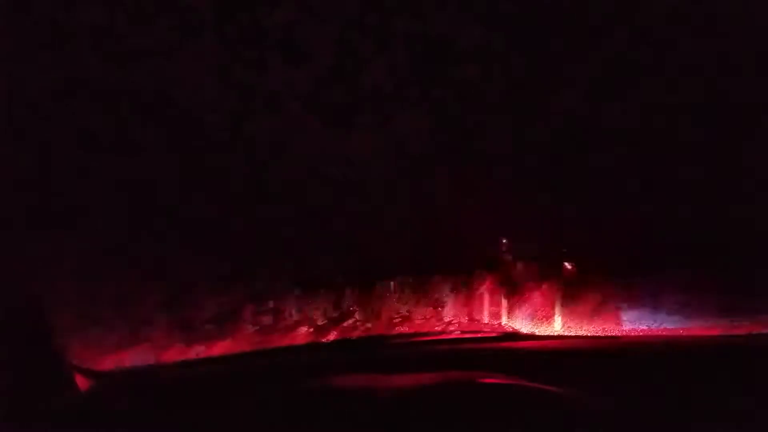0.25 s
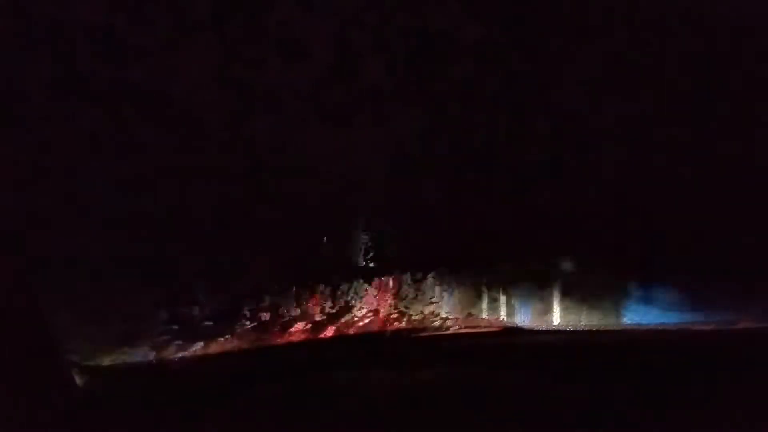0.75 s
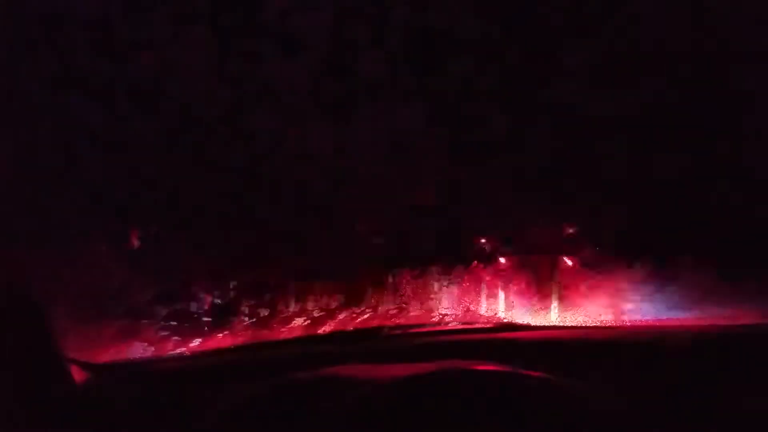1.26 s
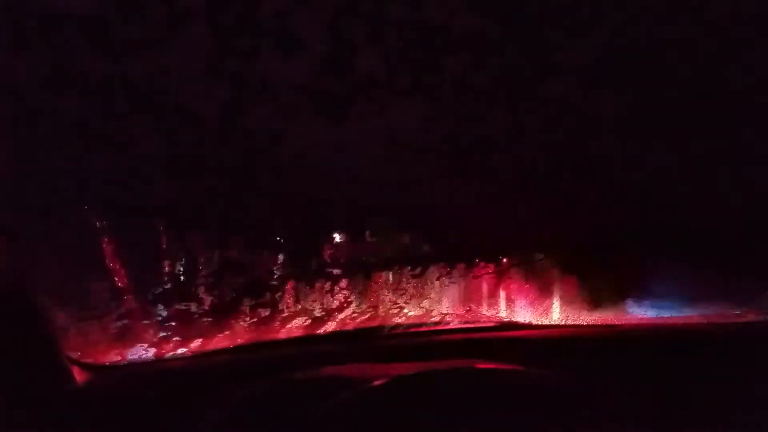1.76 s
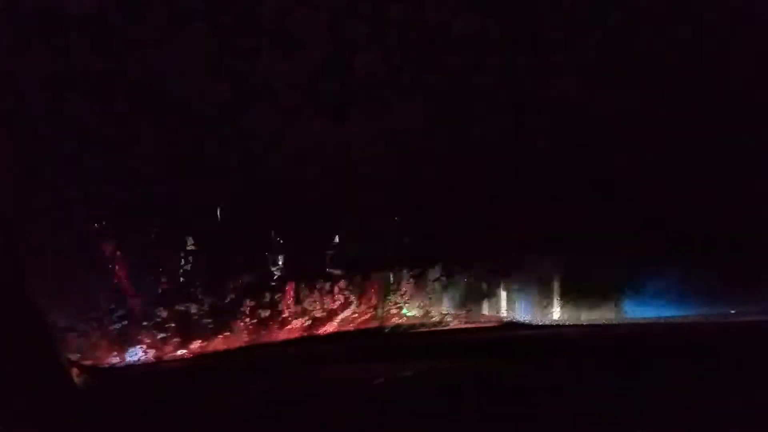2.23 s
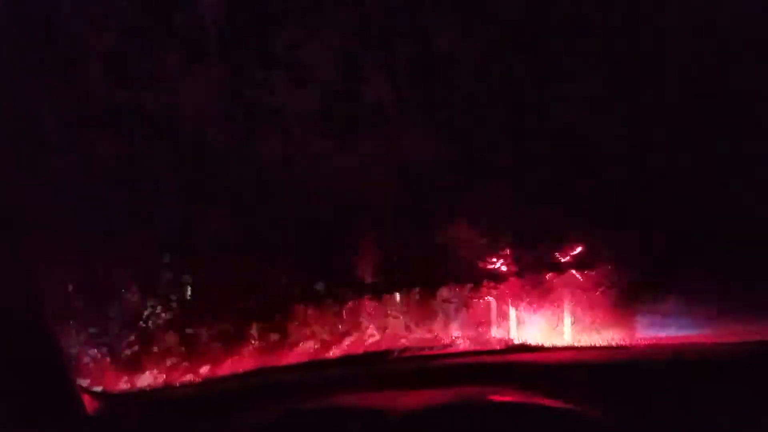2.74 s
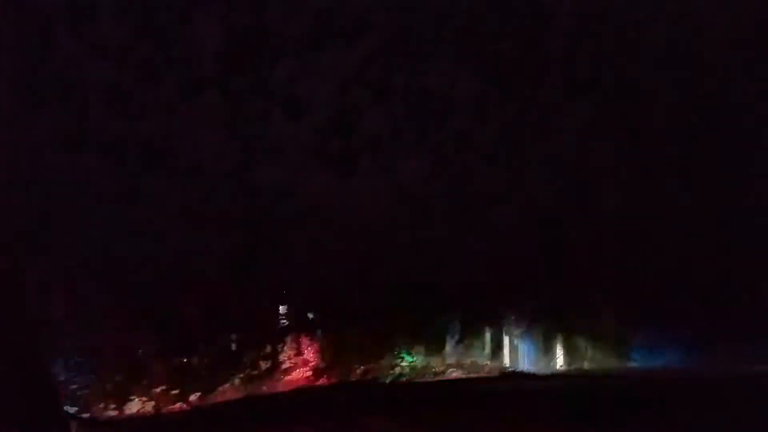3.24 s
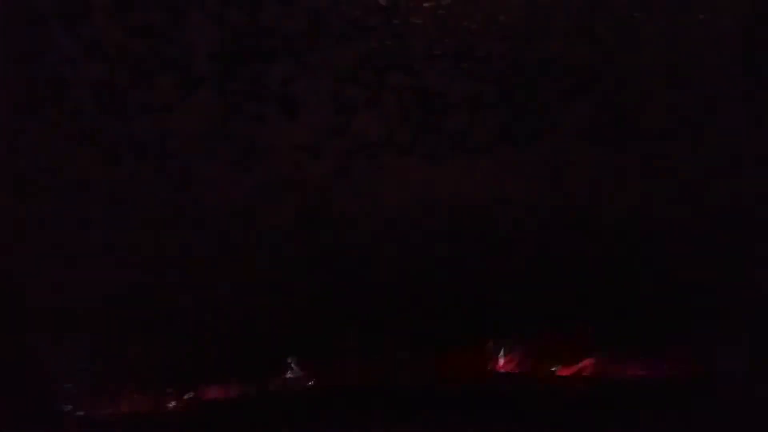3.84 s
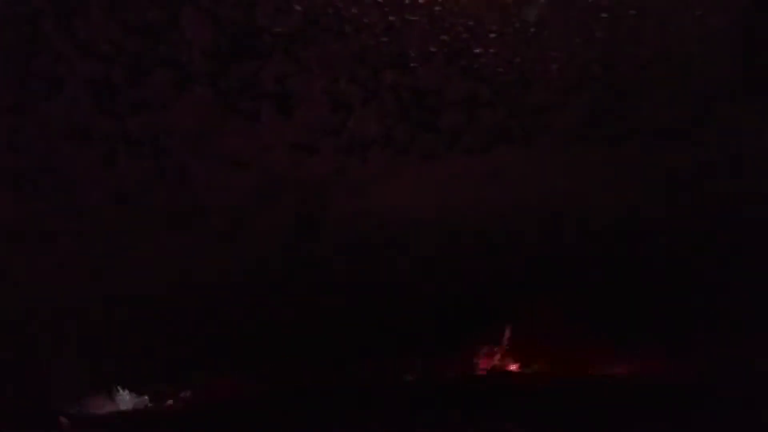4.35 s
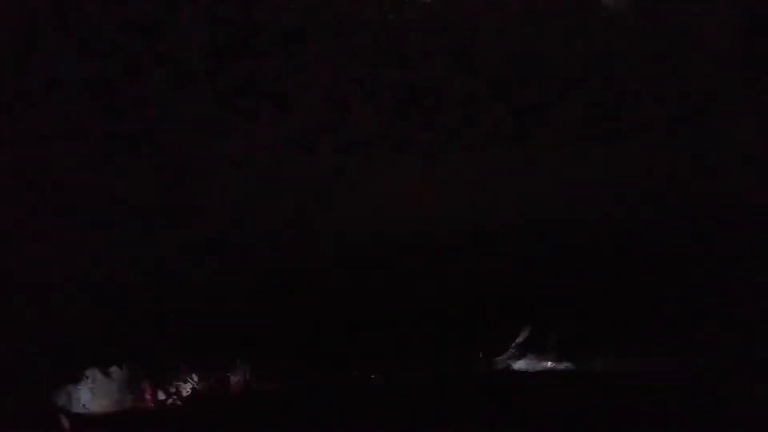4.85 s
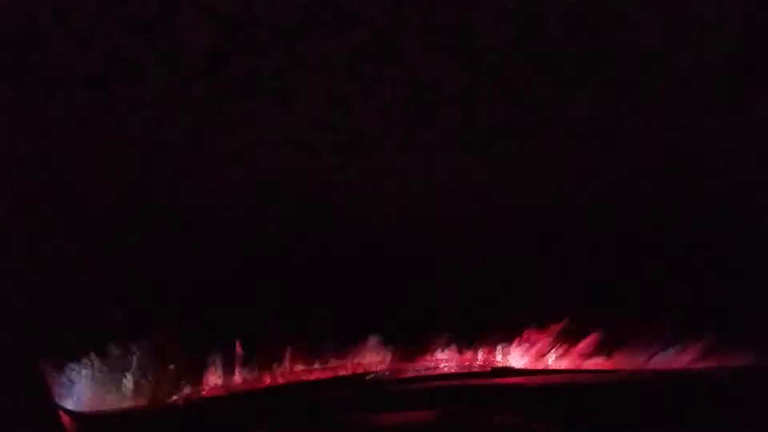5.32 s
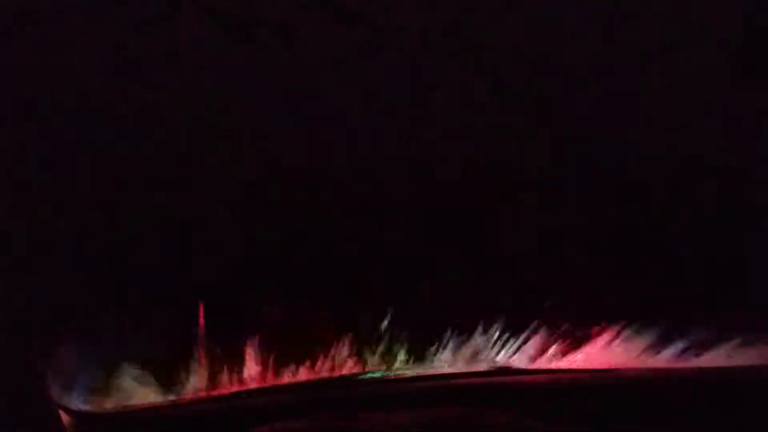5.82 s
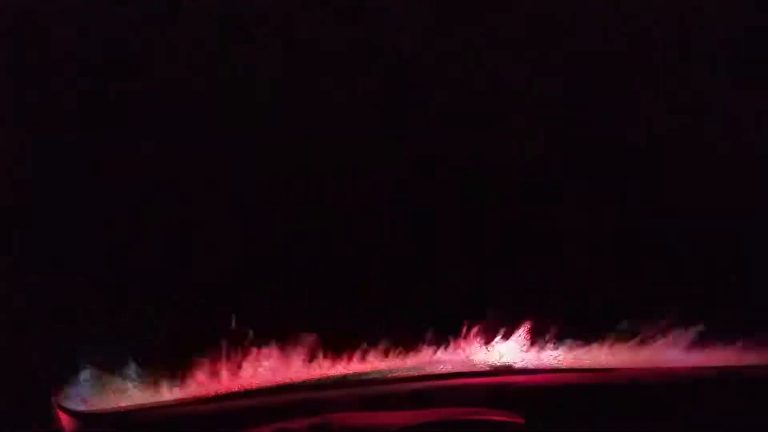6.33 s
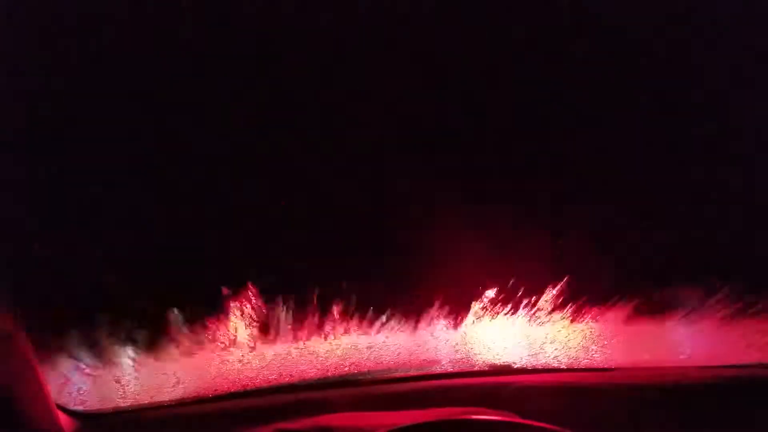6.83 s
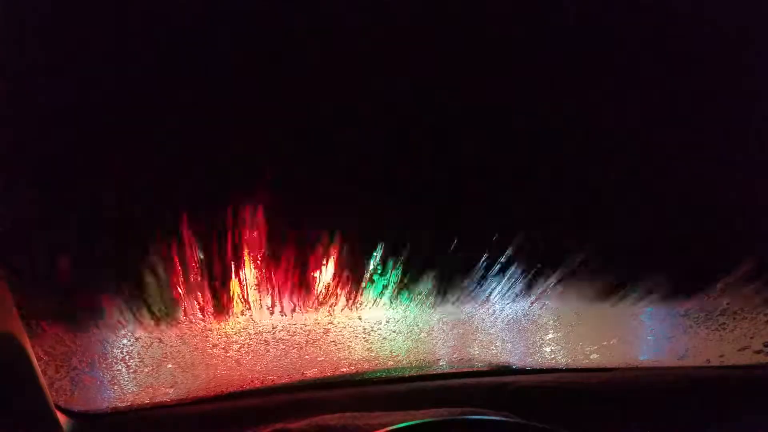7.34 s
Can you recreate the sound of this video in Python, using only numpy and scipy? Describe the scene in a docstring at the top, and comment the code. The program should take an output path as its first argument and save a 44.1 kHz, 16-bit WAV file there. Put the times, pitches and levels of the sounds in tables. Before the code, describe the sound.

Inside a car in an automatic wash, machinery drones, then spinning brushes drum on the body and fling sizzling water at the windscreen.

```python
"""A wavering drone of pumps and brush motors, heard inside a closed car in an automatic wash.
A mist jet shuts off early on; stray cloth strips graze a door. After three seconds the spinning
brushes reach the car: they drum on the steel panels, scrub over the roof and fling water at the
windscreen, where fine spray sizzles and single fat drops tick."""
import sys
import numpy as np
from scipy import signal
from scipy.fft import rfft, irfft, next_fast_len
from scipy.io import wavfile
from scipy.ndimage import uniform_filter1d

SR = 44100
rng = np.random.default_rng(int(sys.argv[2]) if len(sys.argv) > 2 else 0)


def transcribe(signal):
    """Save signal, clipped to [-1, 1], as a 16-bit WAV file at the path in sys.argv[1]."""
    frames = np.atleast_2d(signal).T
    limited = np.clip(frames, -1, 1)
    pcm = np.round(limited * 32767).astype(np.int16)
    wavfile.write(sys.argv[1], SR, pcm)


N = 334278
TIME_S = np.arange(N) / SR
FFT_SIZE = 2 * next_fast_len(N // 2 + 8192)
FREQS_HZ = np.maximum(np.arange(FFT_SIZE // 2 + 1) * SR / FFT_SIZE, 1)
CUTOFF_HZ = 15900
REACH_S, TOUCH_S = 2.98, 3.7  # brushes: first contact, full contact

# steel panel modes: pitch_hz, width_hz, level_db
PANEL_MODES = [(72.5, 18, -5.5), (87, 17, 4), (109.7, 23.2, 0.5), (133.1, 27, -1), (160.7, 36.6, -7.5)]
# cloth on the roof: freq_hz, density_db
SCRUB_SPECTRUM = [(250, -15), (420, 4.5), (600, 1.5), (680, 2), (800, 5), (1020, -5.5), (1250, -5),
                  (1550, -20), (2500, -22.5), (5000, -56.5)]
# coarse water on glass: freq_hz, density_db
SPLASH_SPECTRUM = [(500, -4), (1100, -1), (1600, 5.5), (2000, 5.5), (2600, 0), (3100, -5.5), (3800, -4.5),
                   (4800, -14.5), (6500, -15.5), (9000, -41.5), (15500, -28)]
# fine water on glass: freq_hz, density_db
SPRAY_SPECTRUM = [(1500, -30), (3500, -5), (4900, -1.5), (5800, -0.5), (7000, -2.5), (8000, -9.5),
                  (9000, -22.5), (11000, -16.5), (15500, -15)]


def from_db(db):
    """Decibels to gain."""
    return 10 ** (np.asarray(db) / 20)


def unit_rms(x):
    """Scale to unit power."""
    return x / np.sqrt(np.mean(x ** 2) + 1e-20)


def envelope(rows):
    """Gain per sample through rows of time_s, level_db."""
    return from_db(np.interp(TIME_S, *np.transpose(rows)))


def swells(rows):
    """Gaussian gain bumps from rows of centre_s, half_length_s, level_db."""
    return sum(from_db(db) * np.exp(-((TIME_S - s) / half_s) ** 2) for s, half_s, db in rows)


def strikes(rows):
    """Impulse train from rows of start_s, level_db."""
    hits = np.zeros(N)
    for start_s, db in rows:
        hits[int(np.clip(start_s * SR, 0, N - 1))] = from_db(db)
    return hits


def response(spectrum):
    """Gain per FFT bin through rows of freq_hz, level_db."""
    hz, db = np.transpose(spectrum)
    return from_db(np.interp(np.log(FREQS_HZ), np.log(hz), db))


def colour(x, spectrum):
    """Minimum-phase filter of unit power gain."""
    cepstrum = irfft(np.log(unit_rms(response(spectrum))))
    cepstrum[1:FFT_SIZE // 2] *= 2
    cepstrum[FFT_SIZE // 2 + 1:] = 0
    return irfft(rfft(x, FFT_SIZE) * np.exp(rfft(cepstrum)))[..., :N]


def drift(corner_hz):
    """Slow random wander, rms 1."""
    count = N // 40
    hz = np.arange(count // 2 + 1) * SR / N
    slow = irfft(rfft(rng.standard_normal(count)) / (1 + (hz / corner_hz) ** 2))
    return np.interp(np.linspace(0, len(slow) - 1, N), np.arange(len(slow)), unit_rms(slow))


def cabin(pair):
    """Mid and side to left and right: alike in the bass, diffuse in the treble."""
    # cabin stereo width: freq_hz, side_minus_mid_db
    width_curve = [(40, -24), (90, -19.5), (170, -20), (310, -5), (420, -8), (650, -1.5), (800, -8),
                   (1030, 4), (1200, -2.5), (1550, 4.5), (2250, -3.5), (3300, 1), (5000, 0.5), (15000, 0)]
    # cabin balance: freq_hz, left_minus_right_db
    lean_curve = [(150, 0), (600, -1.5), (1300, 4), (2600, 0.3), (5500, 2.5), (10000, -0.5)]
    mid, side = rfft(pair, FFT_SIZE)
    width, lean = response(width_curve), np.sqrt(response(lean_curve))
    left_right = np.array([(mid + width * side) * lean, (mid - width * side) / lean])
    return irfft(left_right)[:, :N]


def steady(x, window_s):
    """Hold the mid signal at unit power over a sliding window."""
    power = uniform_filter1d(x.mean(0) ** 2, max(int(window_s * SR), 2))
    return x / np.sqrt(np.maximum(power, 1e-18))


def impacts(per_s, spread_db):
    """Two trains of random hits with exponentially distributed dB levels."""
    hit = rng.random((2, N)) < per_s / SR
    count = hit.sum()
    level_db = spread_db * np.minimum(rng.exponential(1, count), 5)
    trains = np.zeros((2, N))
    trains[hit] = from_db(level_db) * rng.choice([-1, 1], count)
    return trains


def texture(spectrum, per_s, spread_db, window_s):
    """Dense random hits merge into a steady stereo noise."""
    return steady(cabin(colour(impacts(per_s, spread_db), spectrum)), window_s)


def bursts(hits, spectrum, burst_s, tail_db, tail_s):
    """Each hit starts a fast-dying noise burst; the cabin adds a brief tail."""
    burst, tail = (signal.lfilter([1], [1, -np.exp(-1 / (decay_s * SR))], hits + 1e-18)
                   for decay_s in (burst_s, tail_s))
    noise = rng.choice([-1, 1], (2, N))
    return cabin(colour((burst + from_db(tail_db) * tail) * noise, spectrum))


def motor_tone(hz, width_hz):
    """A motor line whose speed wanders by about its width; rms 1."""
    return np.sqrt(2) * np.sin(2 * np.pi * np.cumsum(hz + width_hz * drift(9.39)) / SR)


def machinery(roar_db=-21.5, hum_db=-35.0, motor_waver_db=1.5, hum_waver_db=2.5):
    """Roar of the wash hall through the body, with motor tones and the pump's hum."""
    # machine rumble and hiss: freq_hz, density_db
    rumble = [(22, -19.5), (37, -20), (44, -14.5), (54, -13.5), (66, -16), (85, -10), (98, -9), (120, -2),
              (147, 1), (195, -6), (242, -2.5), (260, -6), (278, -2.5), (320, -9.5), (362, -8.5),
              (420, -14.5)]
    hiss = [(480, -8), (560, -13), (680, -19.5), (800, -17), (980, -26), (1200, -27.5), (1550, -34),
            (2100, -37), (3100, -45), (4300, -48.5), (6800, -58.5), (9000, -73.5), (15500, -65)]
    # motor lines: pitch_hz, level_db, width_hz
    lines = [(120.5, -32.5, 2.7), (273.5, -39.5, 3.6), (776, -45, 17.86)]
    # pump hum swells: centre_s, half_length_s, level_db
    hum_swells = [(0.06, 0.05, -36), (1.15, 0.14, -36), (1.74, 0.05, -31), (2.31, 0.025, -27),
                  (2.93, 0.12, -31.5), (3.31, 0.07, -26), (3.78, 0.1, -31.5), (5.7, 0.1, -32),
                  (6.25, 0.07, -34), (6.85, 0.06, -30)]
    roar = steady(cabin(colour(rng.standard_normal((2, N)), rumble + hiss)), window_s=0.18)
    motors = sum(from_db(db + motor_waver_db * drift(5.0)) * motor_tone(hz, width_hz)
                 for hz, db, width_hz in lines)
    hum_gain = from_db(hum_db + hum_waver_db * drift(12.0)) + from_db(-1.0) * swells(hum_swells)
    return from_db(roar_db) * roar + motors + hum_gain * motor_tone(hz=518, width_hz=3.07)


def brush_motor(idle_hz=242.6, sag_hz=3.015, idle_db=-32, load_db=-30, waver_db=0.5,
                load_from_s=4.85, load_to_s=6.55, ramp_s=0.14):
    """The motor throbs at idle; it grows louder and sags while the brush bears on the roof."""
    # idle throbs: centre_s, half_length_s, level_db
    throbs = [(0.18, 0.048, -32), (1.06, 0.053, -30), (1.82, 0.065, -37), (2.92, 0.094, -31)]
    load = np.clip(np.minimum(TIME_S - load_from_s, load_to_s - TIME_S) / ramp_s, 0, 1)
    gain = from_db(idle_db) + swells(throbs) + from_db(load_db) * load
    return gain * from_db(waver_db * drift(6.5)) * motor_tone(idle_hz - sag_hz * load, width_hz=3.03)


def jet_gains(splash_db=-54, spray_db=-66, mist_db=-58, sputter_db=2.0, off_s=0.26, fall_db_per_s=49):
    """Splash, spray and mist gains of a fine jet that sputters, then shuts off."""
    flow_db = sputter_db * drift(18) - fall_db_per_s * np.maximum(TIME_S - off_s, 0)
    return np.array([from_db(db + flow_db) for db in (splash_db, spray_db, mist_db)])


def brush_gap(lead_s=0):
    """1 while the brushes are away, 0 once they lie on the car."""
    return 1 - np.clip((TIME_S + lead_s - REACH_S) / (TOUCH_S - REACH_S), 0, 1)


def flung_gains(splash_db=-40, spray_db=-54, mist_db=-58.5, away_db=-14.5, mist_away_db=-20,
                growth_db_per_s=1.7, thinning_db_per_s=8.0, thinning_s=7.2):
    """Splash, spray and mist gains rise as the brushes close in; the mist leads and thins at the end."""
    # thicker sheets of water: centre_s, half_length_s, rise_db
    surges = [(4.19, 0.037, 3), (4.875, 0.21, 2.5), (5.514, 0.26, 7), (6.715, 0.14, 2.5)]
    gap, mist_gap = brush_gap(), brush_gap(lead_s=0.1)
    flow_db = sum(db * np.exp(-((TIME_S - s) / half_s) ** 2) for s, half_s, db in surges)
    flow_db += (1 - gap) * drift(35.0)
    growth_db = growth_db_per_s * np.clip(TIME_S - TOUCH_S, 0, 3.2)
    thinning_db = thinning_db_per_s * np.maximum(TIME_S - thinning_s, 0)
    # flow lifts the finest drops most
    return from_db([splash_db + away_db * gap + 0.62 * flow_db,
                    spray_db + away_db * gap + flow_db + growth_db,
                    mist_db + mist_away_db * mist_gap + 1.55 * flow_db - thinning_db])


def sizzle(lashing, splash_gain, spray_gain, mist_gain, trim_db=-0.5,
           splash_clump_db=1.57, spray_clump_db=1.67, mist_clump_db=2.0):
    """Strips throw clumps of drops at the glass; the smaller the drops, the higher they sizzle."""
    # mist on glass: freq_hz, density_db
    mist_spectrum = [(4000, -16), (7000, -7), (9000, -9.5), (10200, -7), (11200, 2.5), (12800, -1),
                     (14000, 2.5), (15500, -2.5)]
    splash = texture(SPLASH_SPECTRUM, per_s=5000, spread_db=1.0, window_s=0.13)
    spray = texture(SPRAY_SPECTRUM, per_s=1800, spread_db=0.6, window_s=0.11)
    mist = texture(mist_spectrum, per_s=9900, spread_db=4.5, window_s=0.1)
    return (from_db(splash_clump_db * lashing) * splash_gain * splash
            + from_db(trim_db + spray_clump_db * lashing) * spray_gain * spray
            + from_db(trim_db + mist_clump_db * drift(45)) * mist_gain * mist)


def patter(spray_gain, trim_db=-2.0, decay_cycles=3.0, lowest_hz=1900, pitches=20):
    """Small drops land one by one, each ringing a few cycles at a random pitch."""
    # small drops on glass: freq_hz, density_db
    spectrum = [(1500, 4), (2100, 4.5), (3200, 3), (4500, -2), (6500, 0.5), (8000, -9.5), (9300, -20),
                (11300, -8.5), (15500, -9)]
    hits = impacts(per_s=600, spread_db=3.0)
    pitch_index = rng.integers(0, pitches, N)
    rings = 0
    for k, hz in enumerate(np.geomspace(lowest_hz, CUTOFF_HZ, pitches)):
        radius, angle = np.exp(-hz / (decay_cycles * SR)), 2 * np.pi * hz / SR
        resonator = [angle * np.sin(angle)], [1, -2 * radius * np.cos(angle), radius ** 2]
        rings += signal.lfilter(*resonator, hits * (pitch_index == k) + 1e-18)
    return from_db(trim_db) * spray_gain * unit_rms(cabin(colour(rings, spectrum)))


def fat_drops(mist_gain, tick_db=-5.5, splat_db=8.0, spatter_db=3.5):
    """Fat drops tick, the biggest with a lower splat; smaller strays follow the mist."""
    # fat drops: start_s, level_db
    landings = [(0.022, -34), (0.3062, -43), (0.6399, -43), (0.7512, -40.5), (1.085, -39), (1.1917, -41),
                (1.5344, -45), (1.6407, -43.5), (2.5331, -39), (2.8983, -40.5), (3.3363, -41),
                (3.4256, -36), (3.4685, -35), (3.632, -38), (3.9299, -32), (4.0302, -34), (4.1613, -42),
                (4.3625, -31), (4.484, -34), (4.615, -38), (4.73, -43), (4.9021, -38), (5.0942, -33),
                (5.1607, -28), (5.3792, -27), (5.9449, -31), (6.4907, -23.5), (6.6852, -30), (6.7316, -29),
                (6.79, -20.5), (7.2302, -22.5), (7.4046, -28), (7.5438, -31)]
    # tick on glass: freq_hz, density_db
    tick_spectrum = [(1500, -20.5), (4800, -7.5), (6200, -0.5), (7500, -5), (9500, -13), (11500, -7.5),
                     (13000, -11), (15000, -3)]
    drops = strikes(landings)
    strays = mist_gain * np.abs(impacts(per_s=110, spread_db=-0.2)[0])
    spatter = from_db(spatter_db) * mist_gain * np.abs(impacts(per_s=150, spread_db=0.5)[0])
    splat_hits = from_db(splat_db) * drops ** 2 + spatter
    tick_hits = from_db(tick_db) * drops + strays
    splats = bursts(splat_hits, SPRAY_SPECTRUM, burst_s=0.0014, tail_db=-20, tail_s=0.009)
    ticks = bursts(tick_hits, tick_spectrum, burst_s=0.0014, tail_db=-11.5, tail_s=0.0089)
    return splats + ticks


def plinks(decay_s=0.0026):
    """Two drops ring briefly as they land."""
    # ringing drops: start_s, pitch_hz, level_db
    landings = [(2.14, 8400, -51), (6.4903, 5900, -33)]
    rings = 0
    for start_s, hz, db in landings:
        age_s = np.maximum(TIME_S - start_s, 0)
        rings += from_db(db) * np.exp(-age_s / decay_s) * np.sin(2 * np.pi * hz * age_s)
    return rings


def squeak(centre_s=0.063, half_length_s=0.00076, hz=1880, fall_hz_per_s=55000, level_db=-25):
    """A wet strip slips once on the glass: a tiny falling chirp."""
    offset_s = TIME_S - centre_s
    chirp = np.sin(2 * np.pi * offset_s * (hz - fall_hz_per_s * offset_s / 2))
    return swells([(centre_s, half_length_s, level_db)]) * chirp


def slaps(trim_db=-5.5):
    """Wet strips and gouts of water slap the glass."""
    # slaps: start_s, level_db
    landings = [(0.0627, -29), (3.5736, -35), (3.5831, -22.5), (3.892, -27), (3.931, -25), (5.0776, -30),
                (5.3802, -32), (5.7564, -21.5), (5.8074, -25), (6.2751, -28), (6.79, -28.5), (7.2302, -23),
                (7.4046, -35), (7.5572, -30)]
    hits = from_db(trim_db) * strikes(landings)
    return bursts(hits, SPLASH_SPECTRUM, burst_s=0.0046, tail_db=-19, tail_s=0.0077)


def windscreen(lashing):
    """Water from the brushes and the jet lands on the glass."""
    # gouts breaking up: centre_s, half_length_s, level_db
    splatters = [(3.895, 0.013, -35), (4.825, 0.013, -34), (4.868, 0.017, -35), (4.908, 0.012, -36),
                 (5.27, 0.023, -46), (5.55, 0.078, -41)]
    splash_gain, spray_gain, mist_gain = np.hypot(flung_gains(), jet_gains())
    splash_gain = np.hypot(splash_gain, swells(splatters))
    return (slaps() + sizzle(lashing, splash_gain, spray_gain, mist_gain)
            + patter(spray_gain) + fat_drops(mist_gain) + plinks() + squeak())


def panel_mode(hits, hz, width_hz):
    """One resonance of a steel panel, driven by hits."""
    band = signal.butter(2, [hz - width_hz / 2, hz + width_hz / 2], "band", fs=SR, output="sos")
    return signal.sosfilt(band, hits)


def grazing():
    """Stray strips flutter against a door panel, which booms softly."""
    # grazes: centre_s, half_length_s, level_db
    grazes = [(0.08, 0.095, -21), (0.73, 0.097, -21), (1.35, 0.14, -26)]
    door = panel_mode(impacts(per_s=400, spread_db=2.5), hz=138, width_hz=44)
    return swells(grazes) * steady(cabin(door), window_s=0.2)


def smacks(trim_db=-3.5):
    """Single strips land flat on the roof."""
    # smacks: start_s, level_db
    landings = [(4.89, -24), (5.552, -20), (5.862, -17), (5.931, -20), (6.106, -15.5), (6.117, -17.5),
                (6.167, -18.5), (6.235, -17), (6.637, -17.5)]
    hits = from_db(trim_db) * strikes(landings)
    return bursts(hits, SCRUB_SPECTRUM, burst_s=0.0094, tail_db=-18.5, tail_s=0.023)


def passing(nearest_s, approach_s, retreat_s, peak_db):
    """Gain of a source moving past: one over distance."""
    offset = (TIME_S - nearest_s) / np.where(TIME_S < nearest_s, approach_s, retreat_s)
    return from_db(peak_db) / np.hypot(1, offset)


def scrubbing(lashing, lash_db=0.66, settle_s=0.34):
    """Wet cloth sticks and slips on the roof, which booms most as the brush passes overhead."""
    # cloth load on the roof, as scrub level: time_s, level_db
    bearing = [(3.3, -35.5), (4.0, -30.5), (5.2, -29), (5.6, -24), (6.2, -23), (6.8, -30), (7.15, -34.5),
               (7.58, -34.5)]
    # roof boom: freq_hz, density_db
    boom_spectrum = [(110, -29.5), (150, 2), (178, -5), (207, 6.5), (224, 0), (240, -0.5), (275, -12),
                     (320, -11), (400, -8), (480, -12.5), (650, -23.5), (1200, -61)]
    contact = np.clip((TIME_S - REACH_S) / settle_s, 0, 1)
    boom_gain = passing(nearest_s=6.5, approach_s=1.53, retreat_s=1, peak_db=-18)
    rub_gain = envelope(bearing) * from_db(lash_db * lashing)
    boom = texture(boom_spectrum, per_s=900, spread_db=0.0, window_s=0.19)
    rub = texture(SCRUB_SPECTRUM, per_s=3000, spread_db=3.5, window_s=0.16)
    return contact * (boom_gain * boom + rub_gain * rub)


def thumps(contact_s=0.0026, uneven_db=4.0):
    """Bunches of wet cloth set all panel modes ringing, in a new mix each time."""
    # soft, heavy blows: start_s, peak_db
    blows = [(3.531, -7), (3.68, -7), (3.784, -8), (3.848, -9), (4.282, -9), (4.965, -18), (5.701, -16),
             (6.211, -9), (6.434, -6), (6.487, -15), (6.575, -10)]
    hz, width_hz, mode_db = np.transpose(PANEL_MODES)[:, :, None]
    age_s = TIME_S[:SR // 4]
    attack = 1 - np.exp(-age_s / contact_s)
    modes = attack * np.exp(-np.pi * width_hz * age_s) * np.sin(2 * np.pi * hz * age_s)
    track = np.zeros(N + SR)
    for start_s, peak_db in blows:
        mix = from_db(mode_db + uneven_db * rng.standard_normal(mode_db.shape))
        blow = (mix * modes).sum(0)
        start = int(start_s * SR)
        track[start:start + len(blow)] += from_db(peak_db) * blow / np.abs(blow).max()
    return track[:N]


def drumming(sway_db=-19, sway_floor_db=-45, lurch_db=4.0, strips_per_s=420, spread_db=0.5):
    """Cloth strips beat the panels, which boom; the whole body shakes below them."""
    # brush pressure, as drumming level: time_s, level_db
    pressure_curve = [(3.0, -31.5), (3.42, -20.5), (3.58, -14.5), (4.2, -20), (4.72, -16), (5.45, -18.5),
                      (5.72, -16), (5.97, -18.5), (6.25, -15), (6.9, -18.5), (7.28, -21), (7.58, -28)]
    # brush shoves on the body: centre_s, half_length_s, level_db
    shoves = [(3.62, 0.15, -30), (3.97, 0.1, -25.5), (4.18, 0.067, -28), (4.43, .09, -26), (5.99, .09, -25),
              (6.27, .1, -28)]
    # body sway: freq_hz, density_db
    sway_spectrum = [(15, -33), (27, -20.5), (40, -3.5), (51, 12), (57, 4.5), (64, -6), (75, -22.5),
                     (110, -60)]
    pressure = envelope(pressure_curve)
    shake_gain = np.hypot(from_db(sway_floor_db), from_db(sway_db) * pressure)
    shake_gain *= from_db(lurch_db * drift(5.0))
    sway_gain = np.hypot(shake_gain, swells(shoves))
    panels = sum(from_db(db) * panel_mode(impacts(strips_per_s, spread_db), hz, width_hz)
                 for hz, width_hz, db in PANEL_MODES)
    sway = texture(sway_spectrum, strips_per_s, spread_db, window_s=0.26)
    return pressure * steady(cabin(panels), window_s=0.099) + sway_gain * sway


def scene():
    """Machinery outside, water on the glass, brushes on the body."""
    lashing = drift(corner_hz=56)  # uneven strip strokes, common to water and scrubbing
    water = windscreen(lashing)
    brushes = grazing() + drumming() + thumps() + scrubbing(lashing) + smacks()
    return machinery() + brush_motor() + water + brushes


def record(dry):
    """Cut the deepest rumble, round the highest peaks, cut the top."""
    ceiling, low_cut_hz = 1.1, 32
    highpass = signal.butter(4, low_cut_hz, "high", fs=SR, output="sos")
    lowpass = signal.ellip(12, 0.1, 80, CUTOFF_HZ, fs=SR, output="sos")
    rounded = ceiling * np.tanh(signal.sosfilt(highpass, dry) / ceiling)
    return signal.sosfilt(lowpass, rounded)


dry = scene()
out = record(dry)
transcribe(out)
```